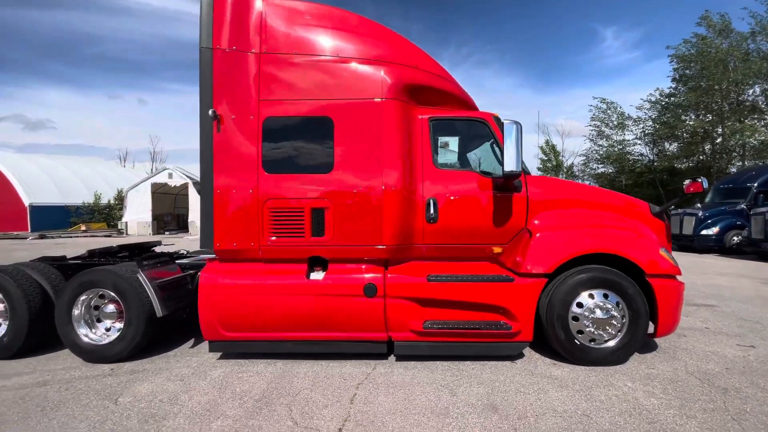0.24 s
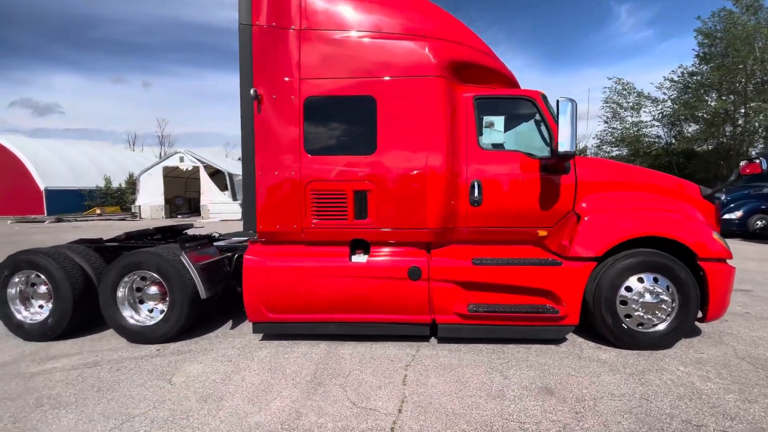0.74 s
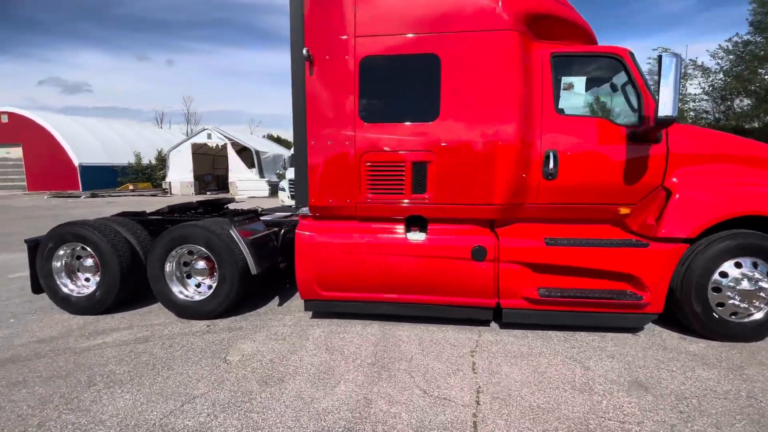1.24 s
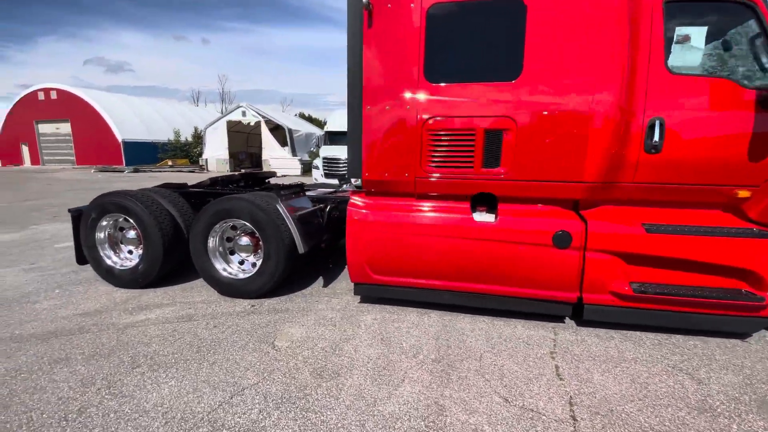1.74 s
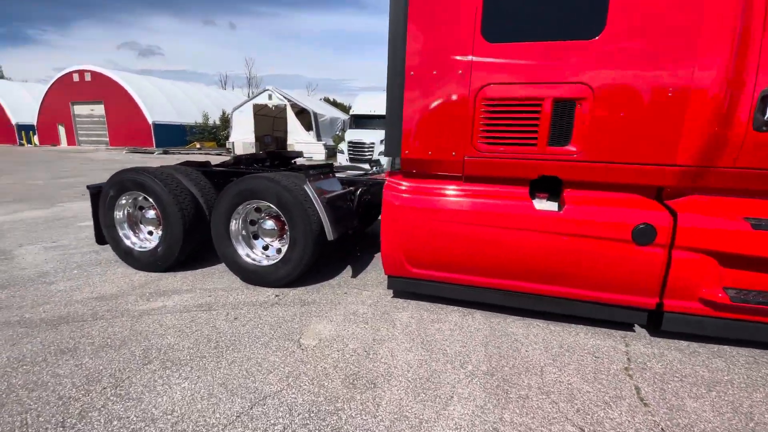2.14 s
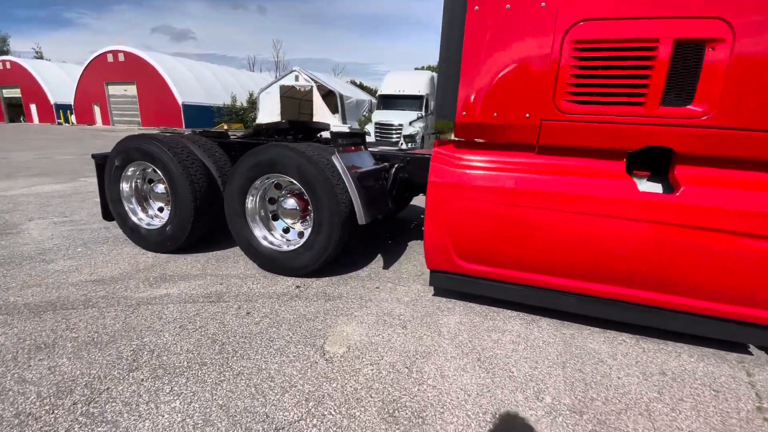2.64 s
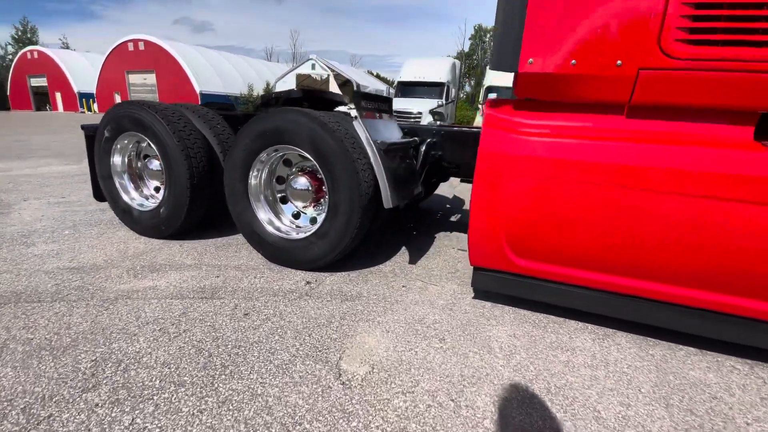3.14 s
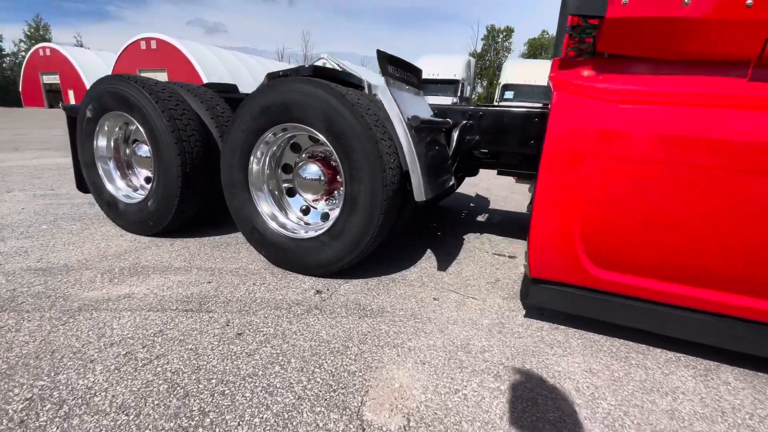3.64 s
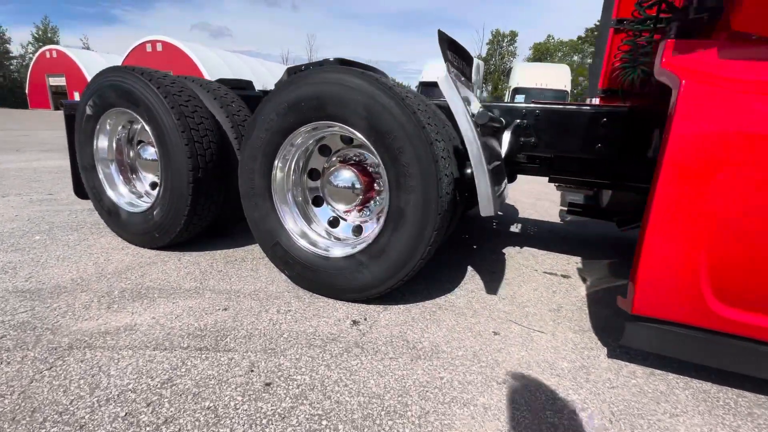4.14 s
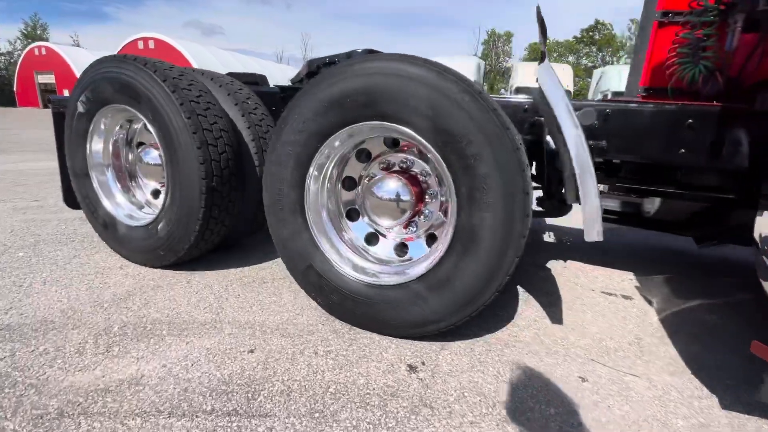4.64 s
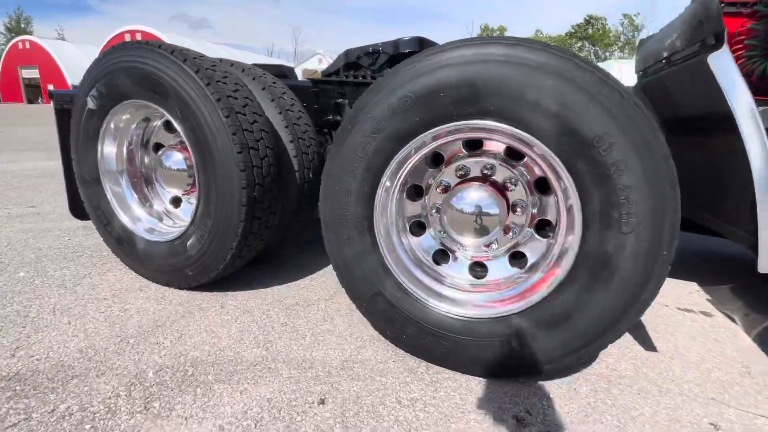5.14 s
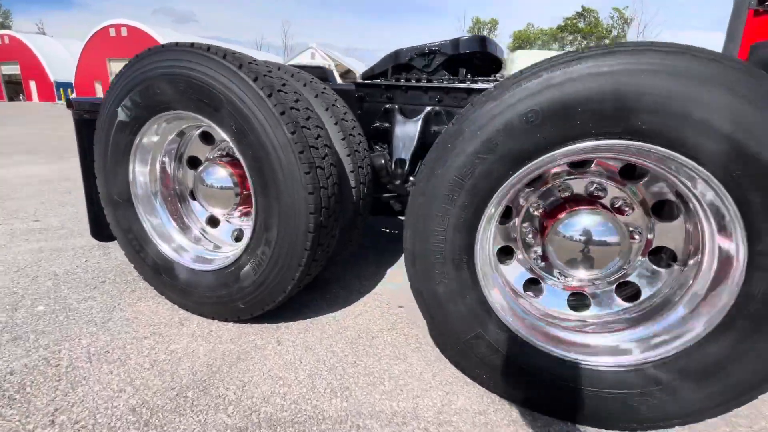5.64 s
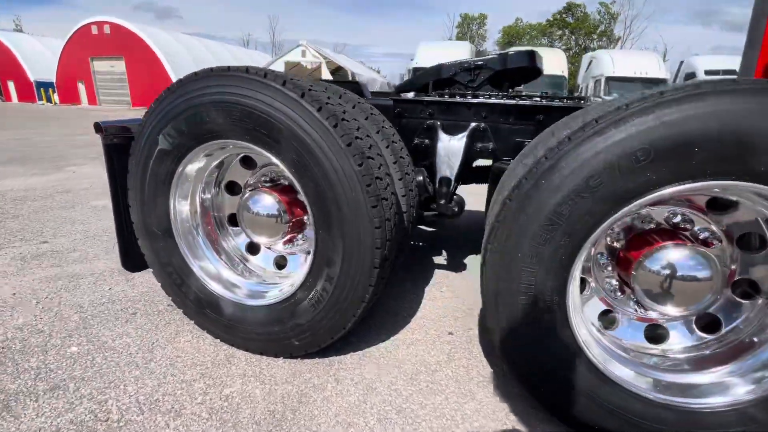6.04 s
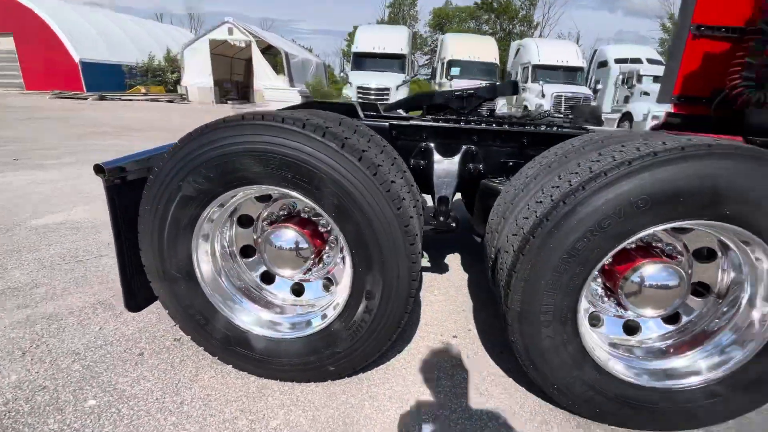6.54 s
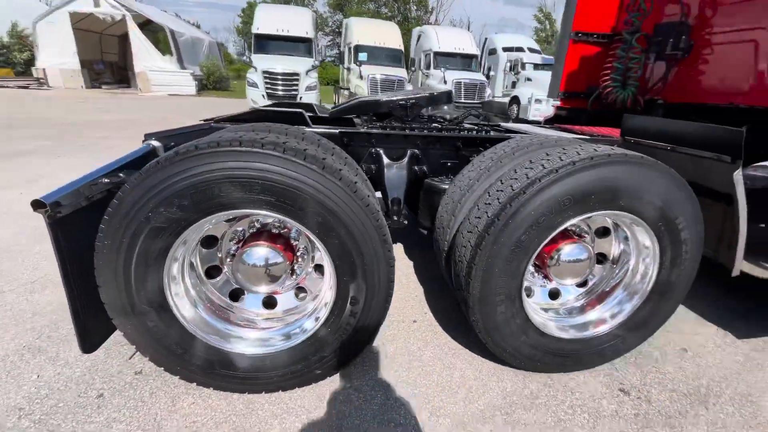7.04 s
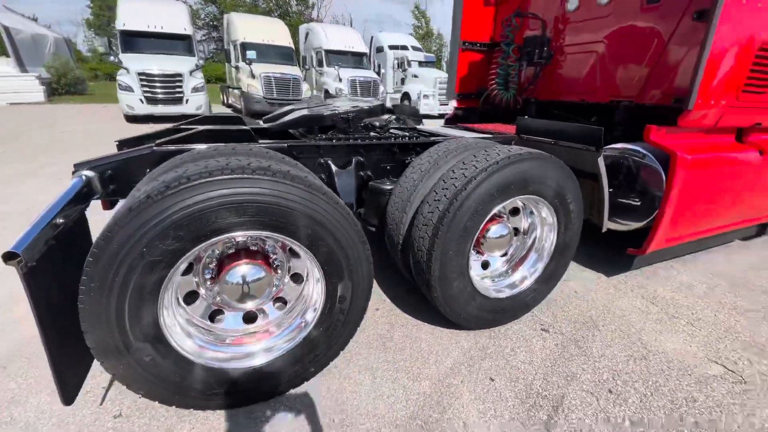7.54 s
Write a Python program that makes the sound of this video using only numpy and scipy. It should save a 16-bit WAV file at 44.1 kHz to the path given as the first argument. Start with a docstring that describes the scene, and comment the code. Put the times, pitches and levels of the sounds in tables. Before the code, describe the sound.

A heavy diesel truck idles with a throbbing, clattering drone while wind buffets the microphone, then a sharp burst of compressed air hisses out.

```python
"""An open lot: a six-cylinder diesel truck idles while a handheld stereo microphone is carried along its side.
Exhaust and air compressor are sums of shaft harmonics, the exhaust over noise rumble; clatter is noise and
rung block modes; hiss, chirp and wind are shaped noise, and a thin whine is a fluttering tone.
Eddies pop on the ports, grit ticks underfoot and the air dryer purges once in decaying noise.
The bass sinks for a moment after the purge and thins twice."""
import sys
import numpy as np
from scipy import signal
from scipy.fft import rfft, irfft, next_fast_len
from scipy.io import wavfile

SR = 44100
rng = np.random.default_rng(int(sys.argv[2]) if len(sys.argv) > 2 else 0)


def master_out(mix):
    """Clip the mix to full scale and print it as 16-bit PCM to the path in sys.argv[1]."""
    frames = np.transpose(np.atleast_2d(mix))
    ceiling = np.clip(frames, -1, 1)
    pcm = np.round(ceiling * 32767).astype(np.int16)
    wavfile.write(sys.argv[1], SR, pcm)


N = 343523
TIME = np.arange(N) / SR
PADDED = next_fast_len(N)

# wind on the ports: (time [s], gust level [dB], left-right pan [dB], thud level [dB])
WIND = [(0.0, -49, 10, -42), (0.8, -27.5, 8.5, -22), (1.05, -26, 10, -28), (1.15, -18.5, 5.5, -19.5),
        (1.4, -21.5, 14, -22), (1.8, -27.5, 13, -28.5), (2.3, -36, 12, -25.5), (2.8, -27, 3, -19.5),
        (3.2, -29, 7.5, -21), (3.45, -26, 4.5, -18.5), (4.1, -33.5, 3, -25.5), (4.8, -26.5, 3, -28.5),
        (5.3, -26.5, 0, -28), (5.6, -24, 1, -23), (6.4, -23, 2, -25), (7.25, -25, 3, -20.5),
        (7.45, -26.5, 3.5, -27), (7.79, -62, 0, -37)]
# strongest buffets: (time [s], pop peak at the left port [dB], nominal pitch [Hz])
BUFFETS = [(1.148, -8, 790), (1.158, -5, 635), (1.18, -4.5, 700), (1.362, -3, 393), (1.657, -3, 750),
           (1.721, -8.5, 630), (2.014, -2, 1150), (2.022, -8, 690), (2.674, -3.5, 760), (2.748, -9, 700),
           (2.81, -5.5, 700), (2.879, -6, 300), (2.908, -12, 760), (2.921, -8, 850), (2.935, -6, 1150),
           (2.955, -3.5, 1200), (3.16, -9, 520), (3.352, -5.5, 760), (3.496, -7, 320), (3.548, -7, 900),
           (3.73, -6, 950), (4.78, -7, 650), (5.051, -9, 650), (6.025, -6, 327), (6.453, -7, 440),
           (7.294, -7, 500), (7.35, -9, 398)]
# engine whine: (time [s], level [dB])
WHINE = [(0, -64), (1.5, -60), (3, -59), (4.4, -60), (4.8, -56), (5.8, -58), (6.3, -56), (6.77, -54),
         (6.95, -63), (7.79, -61)]
# grit ticks: (time [s], level [dB], strongest pitch [Hz], t60 [s])
TICKS = [(4.443, -15, 1300, .03), (4.460, -7.5, 1250, .025), (4.8558, -20, 1600, .04),
         (4.9224, -22, 1450, .04), (5.092, -23, 1700, .2), (5.2317, -22, 2100, .1), (5.30, -21, 1300, .2),
         (5.325, -27, 2700, .2), (5.365, -25, 1700, .12), (5.495, -23, 1900, .04), (7.089, -28, 1300, .04),
         (7.159, -26, 1200, .04), (7.297, -21, 1100, .06), (7.335, -23, 950, .04), (7.355, -15, 1450, .012),
         (7.526, -17.5, 850, .02), (7.545, -29, 2450, .1)]
# modes rung by every tick: (frequency [Hz], level [dB])
GRIT_MODES = [(720, -3), (1060, -3), (1450, -4), (1720, -8), (2300, -8), (2550, -9), (2970, -11)]
# truck along the walk: (time [s], exhaust level [dB], compressor level before its trim [dB], clatter level [dB])
TRUCK = [(0, -16, -17.5, -26.5), (1.0, -17.5, -18.5, -28.5), (1.58, -18, -20.5, -27),
         (1.7, -17.5, -26, -27), (2.2, -18.5, -21, -27.5), (3.6, -26, -14, -25.5), (4.0, -17.5, -23.5, -27),
         (4.35, -10.5, -29, -25.5), (4.5, -19, -37, -23), (5.1, -15.5, -21.5, -23.5), (5.6, -17, -18, -24),
         (6.6, -17, -20.5, -26.5), (7.16, -21, -29, -32.5), (7.6, -23, -26.5, -32.5), (7.79, -22, -33, -36)]
# fan and intake hiss: (time [s], level [dB])
HISS_LEVEL = [(0, -37), (2, -35.5), (4, -37.5), (6.7, -39.5), (7.1, -39), (7.4, -44), (7.79, -43.5)]
# chirping band: (time [s], level [dB])
CHIRP_LEVEL = [(0, -60), (.25, -46), (1.0, -43.5), (1.4, -49.5), (2.6, -45), (3.2, -68), (7.79, -53)]
# exhaust orders: (multiple of the four-stroke cycle [1], level beside the cab [dB], beside the axles [dB])
EXHAUST_ORDERS = [(12, -35, -36), (15, -32, -29), (16, -40, -39), (18, -24, -21), (19, -33, -32),
                  (20, -39, -37), (21, -19, -21.5), (24, -36, -41), (25, -32, -40), (26, -40, -42),
                  (27, -31, -34), (28, -39, -43), (30, -36, -39), (31, -35, -42), (32, -37, -45),
                  (35, -34, -36), (39, -35, -40), (45, -45, -43)]
# compressor orders: (multiple of its shaft speed [1], level beside the cab [dB], beside the axles [dB])
COMPRESSOR_ORDERS = [(5, -42, -39), (12, -34, -41), (13, -31, -37), (14, -29, -28), (15, -29, -38),
                     (16, -37, -35), (17, -42, -41), (20, -45, -44), (21, -50, -41), (22, -45, -36),
                     (23, -49, -45), (31, -38, -38), (32, -44, -44), (33, -44, -46), (35, -50, -45)]
# block and panel modes: (frequency [Hz], width [Hz], level beside the cab [dB], axles [dB], at the tail [dB])
BLOCK_MODES = [(408.5, 27, 4.5, 6, -11), (486, 6.6, -9, -2.5, 2), (693, 29, 5, -0.5, 0.5),
               (918, 8.2, 1.5, -12, 2), (1041, 18, -10, 0.5, -9), (1245.5, 31, 3.5, 0.5, 6),
               (1385, 19, 2.5, 2.5, -0.5), (1584, 20, 2.5, -1.5, -1), (1870, 9, -12.5, -20, -5),
               (2262, 16, -10, -13.5, -9), (2914, 12, -8, -24, -10), (4250, 20, -20, -15, -17),
               (4970, 100, -30, -14.5, -16)]
# spells of thin bass: (start [s], end [s], gain [dB])
THIN_BASS = [(1.592, 4.416, -9.5), (7.614, 8.0, -7.5)]
# how the left and right channels compare, by frequency:
# (frequency [Hz], likeness [0-1], left phase lead [rad], left over right [dB])
CHANNELS = [(20, .95, 0, 0), (100, .95, -.05, 0), (200, .9, -.2, .5), (600, .65, -1.4, 1),
            (1500, .65, -3, 3), (2200, .3, -5.8, 3), (3300, .4, -4.2, 4), (4100, .3, -6.4, 4),
            (5100, .3, -3.6, 5), (6200, .25, -6.2, 5), (8000, .3, -4, 5), (8700, .5, -6.3, 4),
            (9700, 1, -3 * np.pi, 0), (10500, 1, -3 * np.pi, 0), (11300, .75, -11.3, 0),
            (11800, 1, -4 * np.pi, 0)]
# relative noise spectra, each: (frequency [Hz], density [dB per Hz])
GUST_SPECTRUM = [(20, -28), (60, -4.5), (200, -3.5), (400, -9), (900, -25), (2000, -60), (4000, -106)]
THUD_SPECTRUM = [(15, -30), (30, -23), (50, 19.5), (70, 21), (110, 22.5), (180, 18), (300, -34.5)]
SNAP_SPECTRUM = [(1500, -34), (2500, -5), (3500, -7), (4330, 2), (5200, -1), (6300, 6), (8000, -1.5),
                 (9500, 4), (11100, 5), (12600, -3), (13600, -20)]
JET_SPECTRUM = [(1200, -30), (1600, -4), (2100, -17), (2600, -4), (3400, -6.5), (4400, 0.5), (5300, -1.5),
                (6300, 0.5), (8200, -6.5), (9800, -5), (11200, -1), (12200, -14), (12900, -16),
                (13600, -30)]
HISS_SPECTRUM = [(1100, 6.5), (2200, -7.5), (3400, -3.5), (5000, -1.5), (5800, -7), (8000, -9),
                 (10000, -7.5), (11000, -7), (12300, -18.5), (13200, -45)]
CHIRP_SPECTRUM = [(2300, -50), (2600, 7.5), (2700, 9), (2800, 5.5), (3100, -40)]
RUMBLE_SPECTRUM = [(25, -30), (45, -20), (70, 1.5), (100, 7), (180, -2), (230, -4), (400, -6), (800, -65)]
CLATTER_SPECTRUM = [(150, -5.5), (300, 3), (420, -3.5), (560, 3), (750, 4), (1400, 0), (1900, -12),
                    (2600, -17.5), (4000, -38)]
CLATTER_TAIL_SPECTRUM = [(150, -15), (350, -2), (450, -12), (700, -9), (950, -6), (1250, -5), (1900, -20),
                         (2600, -27), (4000, -34)]

CAB_S, AXLES_S, TAIL_S = 1.0, 5.0, 7.1   # the walk passes these
CYCLE_HZ, COMPRESSOR_HZ, WHINE_HZ = 4.993, 12.745, 6125
BUFFET_PAN_DB = 15   # left over right
FLUTTER_LEAD_S, FLUTTER_DB, FLUTTER_SPAN = .012, -13, (.25, 1.05)   # span in multiples of the pitch
CRUNCH_DB, CRUNCH_SPAN = -5, (.6, 1.4)   # span in multiples of the pitch
TICK_RISE_SHARE = .05   # rise time constant as a share of t60
GRIT_FALL_DB_PER_OCTAVE = 16   # modes weaken away from the pitch of a tick
# purge: the valve snaps open on a burst, the flow sags, then the valve shuts
PURGE_S, OPEN_S, SNAP_DB_PER_S = 6.783, 0.12, 4000
BURST_DB, BURST_HOLD_S, BURST_T60_S = -13.5, 0.014, 0.14
JET_DB, SAG_DB_PER_S, SHUT_DB_PER_S = -19.5, 109, 123
OUTLET_HZ, OUTLET_DB, OUTLET_DB_PER_S = (2600, 2900), -38, 70
# the bass sinks after the purge, sinks a little further, then climbs back
DIP_AFTER_S, DIP_FALL_S, DIP_DEEPEN_S, DIP_RISE_S = 0.0052, 0.021, 0.11, 0.27
DIP_FIRST_DB, DIP_DEEP_DB = -22.5, -27.5
# shares of the bass changes, in dB, that other sounds take
DIP_CLATTER_SHARE, DIP_KNOCK_SHARE, DIP_WIND_SHARE, THIN_THUD_SHARE = 0.78, 0.75, 1, 0.4
SWITCH_S = 0.02
STOPBAND_HZ = 13700


def amp(db):
    """Decibels are twenty times the logarithm of gain."""
    return 10 ** (np.asarray(db) / 20)


def rms_one(x):
    """Normalization: division by the root mean square gives unit effective level."""
    return x / np.sqrt(np.mean(x ** 2) + 1e-20)


def in_time(rows):
    """Linear interpolation of a time table's columns at every sample."""
    s, *columns = np.transpose(rows)
    return [np.interp(TIME, s, column) for column in columns]


def in_hz(rows):
    """Logarithmic frequency interpolation of a table's columns at every bin."""
    hz, *columns = np.transpose(rows)
    bins = np.log(np.fft.rfftfreq(PADDED, 1 / SR) + 1)
    return [np.interp(bins, np.log(hz), column) for column in columns]


def drift(rate_hz):
    """Low-pass filtered chance: noise twice through a one-pole gives slow variation of unit rms."""
    step = 40   # samples between drawn values
    r = np.exp(-2 * np.pi * step * rate_hz / SR)
    white = rng.standard_normal(N // step + 2002)
    slow = signal.lfilter([1], [1, -2 * r, r * r], white)[2000:]   # drop the filter's start
    return np.interp(np.arange(N) / step, np.arange(len(slow)), rms_one(slow))


def coloured(spectrum, flicker_db, rate_hz):
    """Spectral shaping: two independent noises share one spectrum and one flicker."""
    white = rng.standard_normal((2, N)) * amp(flicker_db * drift(rate_hz))
    shaped = irfft(rfft(white, PADDED) * amp(in_hz(spectrum)[0]), PADDED)
    return rms_one(shaped[:, :N])


def sides(pan_db):
    """Level panning: half the difference is added on the left and taken from the right."""
    return amp([pan_db / 2, -pan_db / 2])


def in_channels(pair):
    """Partial coherence: left and right share one signal, shifted in phase, and differ by a second."""
    alike, lead, balance_db = in_hz(CHANNELS)
    alike = np.clip(alike, 0, 1)
    shared, apart = rfft(pair, PADDED) * np.sqrt([1 + alike, 1 - alike])
    turn = np.exp(.5j * lead) * amp(balance_db / 2)
    spectra = [(shared + apart) * turn, (shared - apart) / turn]
    return irfft(spectra, PADDED)[:, :N] / np.sqrt(2)


def bass_dip():
    """Attenuation by a piecewise-linear gain in dB, just after the purge."""
    s = PURGE_S + np.cumsum([DIP_AFTER_S, DIP_FALL_S, DIP_DEEPEN_S, DIP_RISE_S])
    return np.interp(TIME, s, [0, DIP_FIRST_DB, DIP_DEEP_DB, 0])


def thin_bass():
    """Attenuation by a switched gain in dB while the bass is thin."""
    return sum(np.interp(TIME, [start, start + SWITCH_S, end, end + SWITCH_S], [0, db, db, 0])
               for start, end, db in THIN_BASS)


def wind():
    """Turbulent pressure: lumpy noise nearly independent at the two ports, over deep thuds partly opposite there."""
    level_db, pan_db, thud_db = in_time(WIND)
    flicker_db = np.interp(TIME, [3.6, 4.4], [3.5, 2.5])   # evener later on
    own, other = coloured(GUST_SPECTRUM, flicker_db, rate_hz=28.5)
    gusts = amp(level_db) * np.array([own, 1.4 * other - 0.051 * own])
    own, other = coloured(THUD_SPECTRUM, flicker_db=2.0, rate_hz=15)
    thuds = np.array([own, 1.34 * other - 0.5 * own])
    thuds = thuds * amp(thud_db + THIN_THUD_SHARE * thin_bass())
    return sides(pan_db) * amp(DIP_WIND_SHARE * bass_dip()) * (gusts + thuds)


def buffets():
    """Eddy impact: a few cycles falling in pitch inside a duller flutter, weaker and reversed on the right."""
    out, t = np.zeros((2, N)), np.arange(SR // 10) / SR
    late = np.maximum(t - FLUTTER_LEAD_S, 0)
    swell = t / FLUTTER_LEAD_S * np.exp(1 - t / FLUTTER_LEAD_S)
    for s, db, hz in BUFFETS:
        sign, cycles = rng.choice([-1, 1]), 3 + 2 * rng.random()
        turns = np.cumsum(hz * (0.7 + 0.6 * np.exp(-late / 0.002))) / SR
        decay = amp(-60 * late * hz / cycles)
        pop = np.sin(2 * np.pi * turns) * (late * hz) ** 2 * decay
        pop = sign * pop / np.abs(pop).max()
        band = signal.butter(3, np.multiply(FLUTTER_SPAN, hz), "band", fs=SR, output="sos")
        flutter = rms_one(signal.sosfilt(band, rng.standard_normal(len(t))))
        flutter = flutter * swell ** 2 * amp(FLUTTER_DB)
        at = round((s - FLUTTER_LEAD_S - 1 / hz) * SR)   # the pop begins one nominal period early
        out[:, at:at + len(t)] += np.outer([1, -amp(-BUFFET_PAN_DB)], amp(db) * (pop + flutter))
    return out


def ticks():
    """Impact excitation: grit rings fixed modes near its pitch over crunch noise; long ticks rise slowly."""
    out, t = np.zeros(N), np.arange(SR // 5) / SR
    for s, db, pitch_hz, t60 in TICKS:
        band = signal.butter(3, np.multiply(CRUNCH_SPAN, pitch_hz), "band", fs=SR, output="sos")
        sound = rms_one(signal.sosfilt(band, rng.standard_normal(len(t)))) * amp(CRUNCH_DB)
        for hz, mode_db in GRIT_MODES:
            fall_db = GRIT_FALL_DB_PER_OCTAVE * abs(np.log2(hz / pitch_hz))
            chance_db = 2 * rng.standard_normal()
            sound = sound + np.sin(2 * np.pi * hz * t) * amp(mode_db - fall_db + chance_db)
        rise = 1 - np.exp(-t / (TICK_RISE_SHARE * t60))
        at = round(s * SR)
        out[at:at + len(t)] += sound * rise * amp(db - 60 * t / t60)
    return out * sides(1.5)[:, None]


def purge():
    """Turbulent discharge: a snap of air, a bright jet and a lingering low outlet hiss decay exponentially."""
    t = TIME - PURGE_S
    after = np.maximum(t, 0)
    burst = coloured(SNAP_SPECTRUM, flicker_db=1.2, rate_hz=150)
    burst = burst * amp(BURST_DB - 60 * np.maximum(t - BURST_HOLD_S, 0) / BURST_T60_S)
    jet = coloured(JET_SPECTRUM, flicker_db=.8, rate_hz=120)
    shut_db = SHUT_DB_PER_S * np.maximum(t - OPEN_S, 0)   # adds to the sag
    jet = jet * amp(JET_DB - SAG_DB_PER_S * after - shut_db)
    band = signal.butter(2, OUTLET_HZ, "band", fs=SR, output="sos")
    outlet = rms_one(signal.sosfilt(band, rng.standard_normal((2, N))))
    outlet = outlet * amp(OUTLET_DB - OUTLET_DB_PER_S * after)
    onset = amp(SNAP_DB_PER_S * np.minimum(t, 0))
    return (burst + jet + outlet) * onset


def whine():
    """Frequency and amplitude modulation: a thin fluttering tone, louder on the left."""
    turns = np.cumsum(WHINE_HZ + 5 * drift(40)) / SR
    tone = np.sin(2 * np.pi * turns) * amp(in_time(WHINE)[0] + 3 * drift(25))
    return tone * sides(19.0)[:, None]


def chirp():
    """Periodic amplitude modulation: a narrow noise band pulses once per engine cycle."""
    once = np.cos(2 * np.pi * CYCLE_HZ * (TIME - .15))
    noise = coloured(CHIRP_SPECTRUM, flicker_db=1.8, rate_hz=51)
    return noise * amp(in_time(CHIRP_LEVEL)[0] + 2.0 * once)


def firing():
    """Periodicity: six firings per four-stroke cycle give one cosine period each."""
    return np.cos(2 * np.pi * 6 * CYCLE_HZ * TIME)


def patchy(x, patch_db, rate_hz):
    """Interference: narrow bands each swell and fade as paths and echoes shift."""
    edges = np.geomspace(1000, 14000, num=15)
    total = 0
    for k, edge in enumerate(zip(edges, edges[1:])):
        band = signal.butter(2, edge, "band", fs=SR, output="sos")
        sign = (-1) ** k   # neighbours then add at their common edge
        total = total + sign * signal.sosfilt(band, x) * amp(patch_db * drift(rate_hz))
    return rms_one(total)


def hiss():
    """Flow noise: fan and intake give patchy broadband noise, pulsing faintly with the firings."""
    noise = coloured(HISS_SPECTRUM, flicker_db=0.67, rate_hz=30)
    noise = patchy(noise, patch_db=1.0, rate_hz=12.0)
    return noise * amp(in_time(HISS_LEVEL)[0] + 0.14 * firing())


def knocks(per_s):
    """Modal resonance: uneven valve and injector knocks ring block modes that each swell and fade."""
    sizes = amp(2.34 * np.minimum(rng.exponential(1, (2, N)), 4)) * rng.choice([-1, 1], (2, N))
    clicks = sizes * (rng.random((2, N)) < per_s / SR)
    total = 0
    for hz, width_hz, *db in BLOCK_MODES:
        r = np.exp(-np.pi * width_hz / SR)
        resonator = [1, -2 * r * np.cos(2 * np.pi * hz / SR), r * r]
        mode = rms_one(signal.lfilter([1, 0, -1], resonator, clicks))
        total = total + mode * amp(np.interp(TIME, [CAB_S, AXLES_S, TAIL_S], db) + 3 * drift(5))
    return rms_one(total)


def clatter():
    """Structure-borne sound: noise and block knocks pulse with the firings."""
    behind = np.interp(TIME, [TAIL_S - .6, TAIL_S], [0, np.pi / 2])   # the cab screens part of it at the tail
    noise = np.cos(behind) * coloured(CLATTER_SPECTRUM, flicker_db=1.0, rate_hz=22.4)
    noise = noise + np.sin(behind) * coloured(CLATTER_TAIL_SPECTRUM, flicker_db=0.5, rate_hz=17)
    noise = noise * amp(DIP_CLATTER_SHARE * bass_dip())
    ringing = knocks(per_s=500) * amp(-5 + DIP_KNOCK_SHARE * bass_dip())
    level_db = in_time(TRUCK)[2]
    return (noise + ringing) * amp(level_db + 1.2 * firing())


def orders(table, shaft_hz, wander_turns, waver_db):
    """Harmonic series: sines on multiples of a wandering shaft angle waver in level along the walk."""
    turns = shaft_hz * TIME + wander_turns * drift(0.46)
    total = 0
    for multiple, *db in table:
        gain = amp(np.interp(TIME, [CAB_S, AXLES_S], db) + waver_db * drift(1.17))
        total = total + gain * np.sin(2 * np.pi * (multiple * turns + rng.random()))
    return rms_one(total)


def compressor():
    """Rotational harmonics: the geared air compressor hums on multiples of its shaft speed."""
    hum = orders(COMPRESSOR_ORDERS, COMPRESSOR_HZ, wander_turns=0.001, waver_db=2.0)
    return hum * amp(-4.5) * amp(in_time(TRUCK)[1])   # trim, then level


def exhaust():
    """Pulsating flow: harmonics of the engine cycle throb over a noise rumble."""
    throb = orders(EXHAUST_ORDERS, CYCLE_HZ, wander_turns=.001, waver_db=.6)
    rumble = amp(-19) * coloured(RUMBLE_SPECTRUM, flicker_db=1.5, rate_hz=9)
    return (throb + rumble) * amp(in_time(TRUCK)[0])


def truck():
    """Superposition: the machine sounds add, the low ones almost wholly in the shared signal."""
    low = (exhaust() + compressor()) * amp(bass_dip() + thin_bass())
    return low * [[1], [.05]] + clatter() + hiss() + chirp()


def scene():
    """Superposition of all sources in the left and right channels."""
    return wind() + buffets() + ticks() + whine() + in_channels(purge() + truck())


def record(dry):
    """Saturation and low-pass filtering: only the highest peaks are rounded and the top is cut."""
    rounded = dry / (1 + dry ** 4) ** .25
    return signal.sosfilt(signal.cheby2(12, 70, STOPBAND_HZ, fs=SR, output="sos"), rounded)


dry = scene()
out = record(dry)
master_out(out)
```